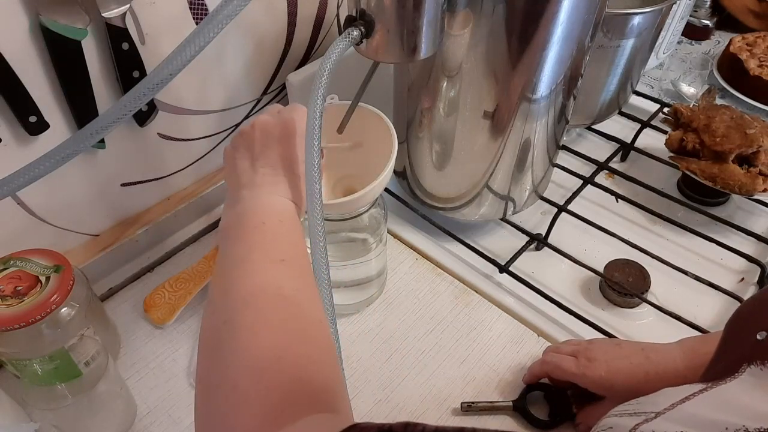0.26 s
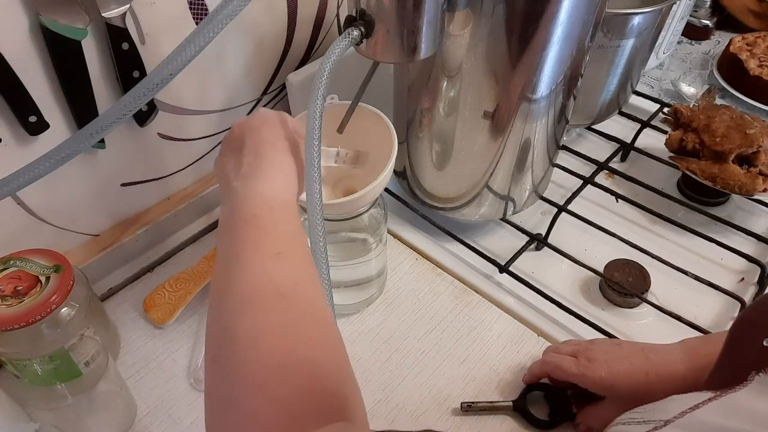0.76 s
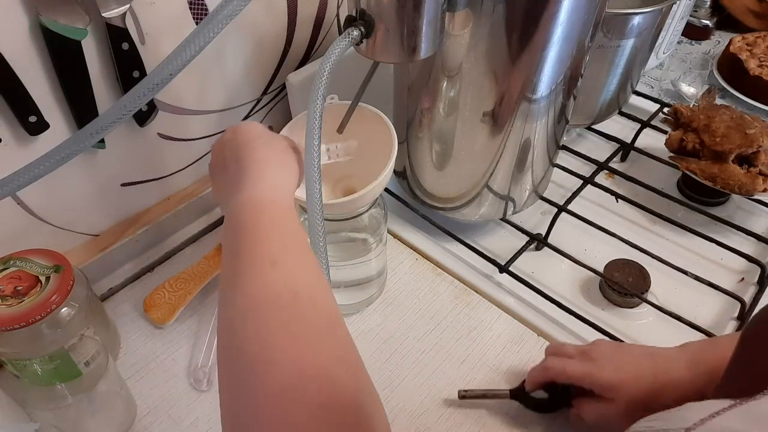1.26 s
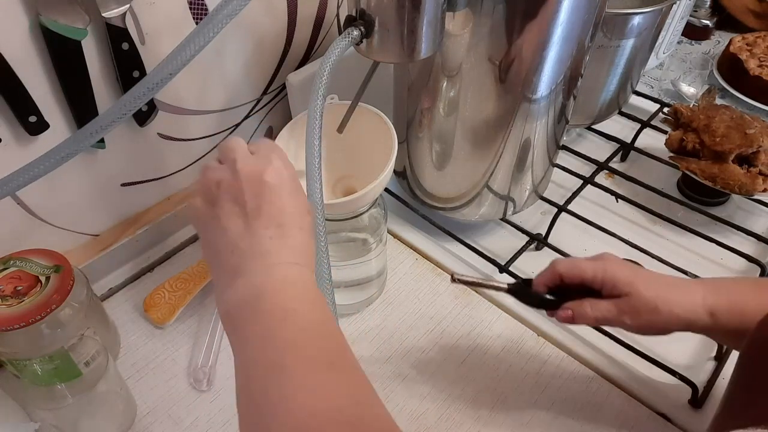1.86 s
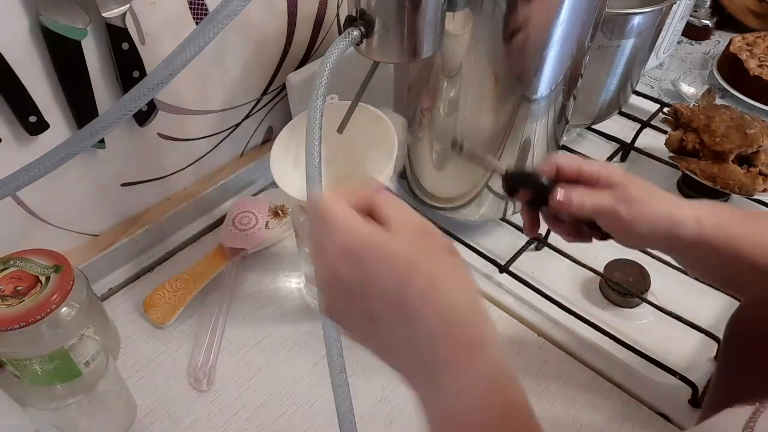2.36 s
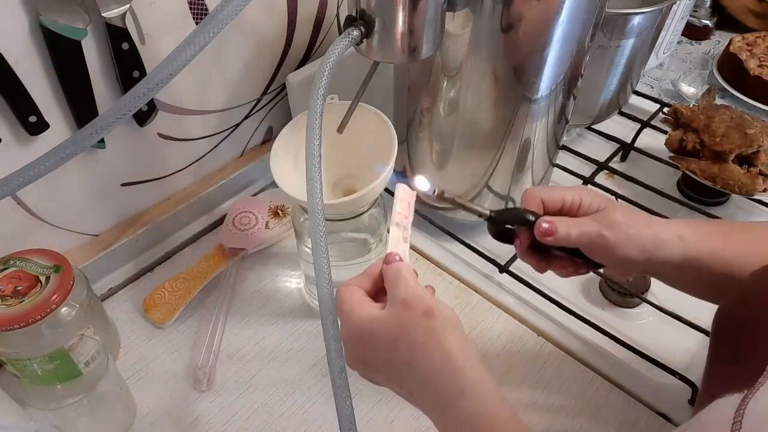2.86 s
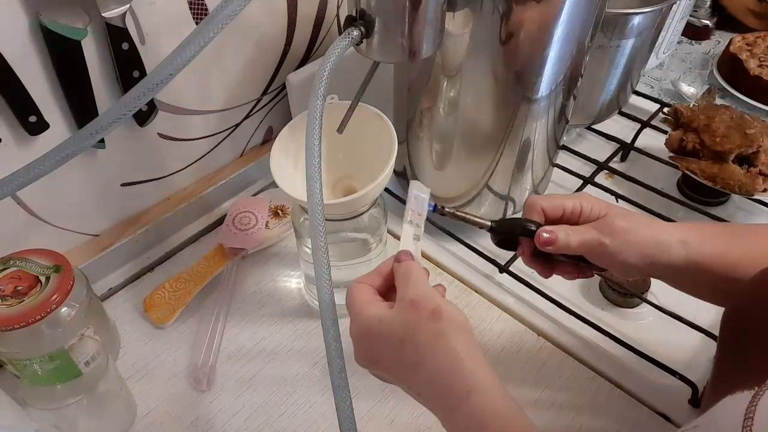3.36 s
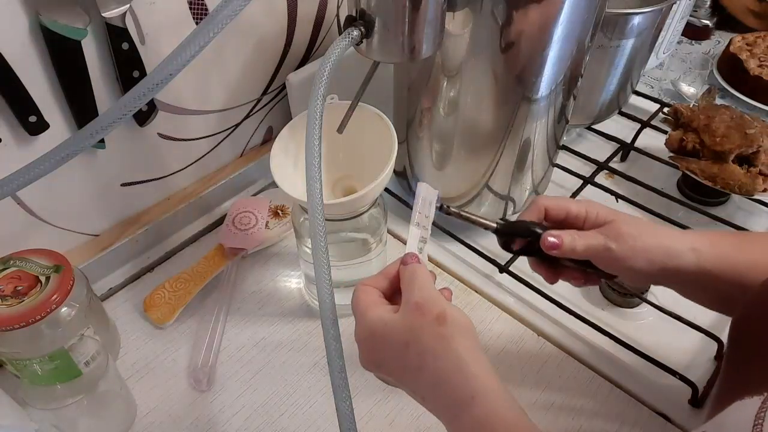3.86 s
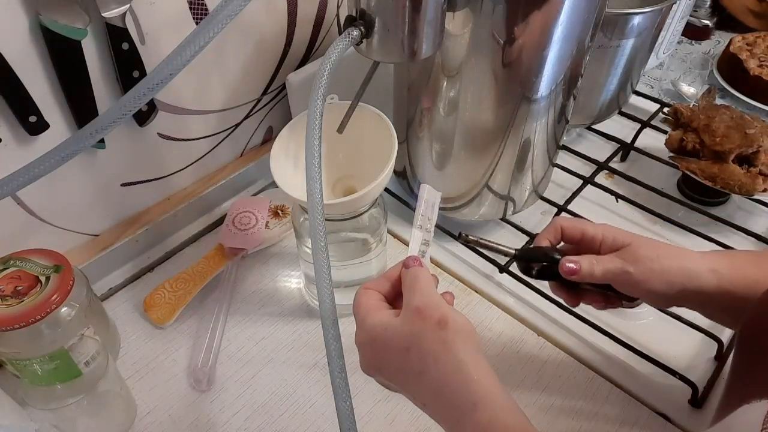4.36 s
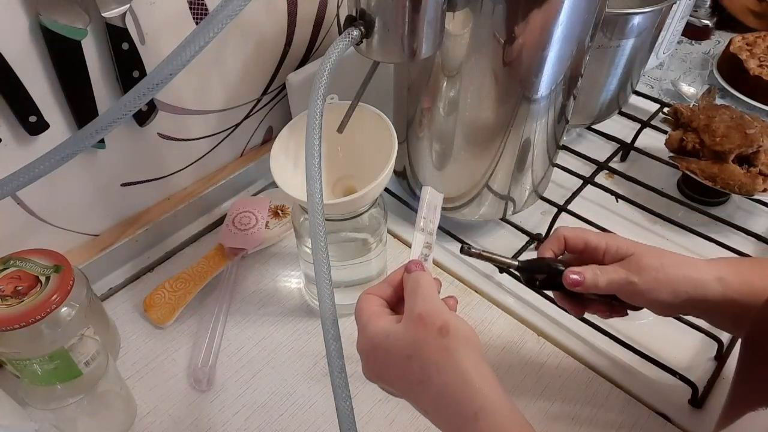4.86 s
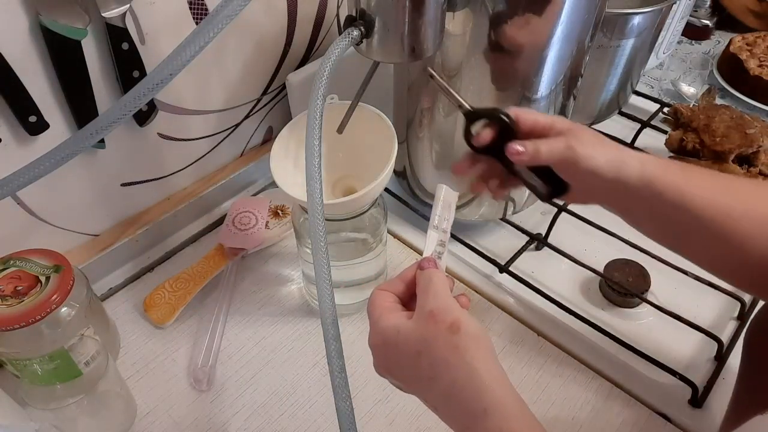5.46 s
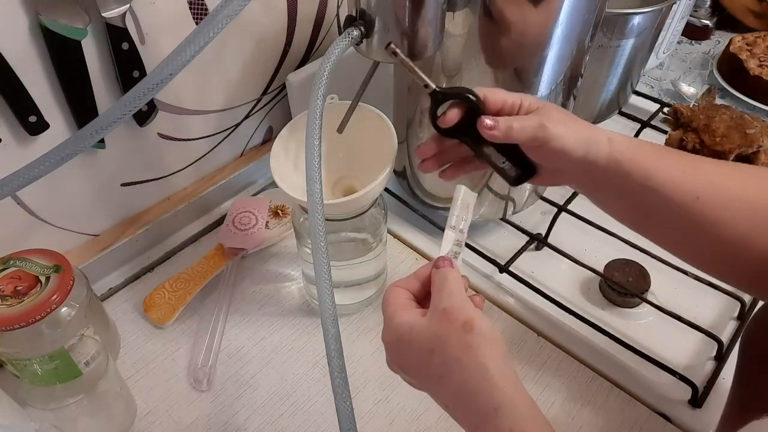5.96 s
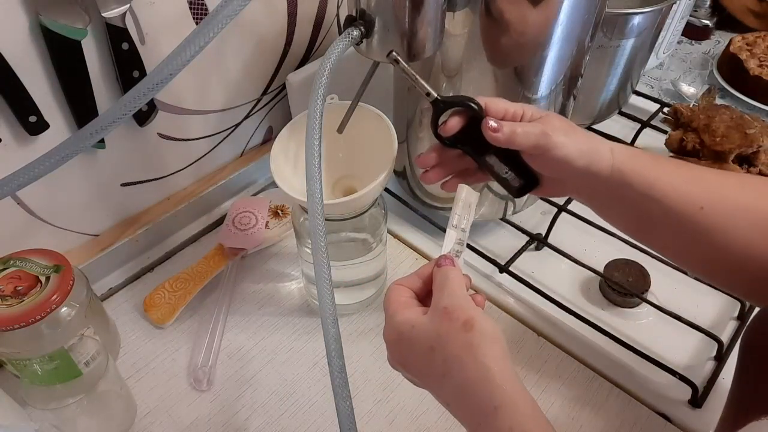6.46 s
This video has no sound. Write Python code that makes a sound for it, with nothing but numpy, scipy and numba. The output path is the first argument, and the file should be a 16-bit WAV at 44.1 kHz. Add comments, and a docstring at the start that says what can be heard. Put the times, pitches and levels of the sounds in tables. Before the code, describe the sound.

Liquid dribbles through a funnel into a jar with hollow, pitched plinks; a lighter knocks, snaps sharply, then releases softly in a small kitchen.

```python
"""A small kitchen: liquid from a hose drips fast into a funnel over a glass jar; each drop rings one of a few
air resonances, over a patter of small drops and a spray of tiny bubbles. A pot simmers (noise through
resonances) over mains hum. A gas lighter is knocked, fired and released (noise bursts through body resonances);
paper and hands tick faintly. The firing click drives the gain control down, and it creeps back for seconds."""
import sys
import numpy as np
from scipy import signal
from scipy.fft import rfft, irfft, next_fast_len
from scipy.io import wavfile
from scipy.ndimage import uniform_filter1d, minimum_filter1d
from numba import njit

SR = 44100
rng = np.random.default_rng(int(sys.argv[2]) if len(sys.argv) > 2 else 0)


def transcribe(u):
    """Save the signal u as a 16-bit wav file named by the first command-line argument.

    u: samples, shape (n,) or (channels, n), limited to [-1, 1]; the rate is SR.
    q: integer samples, one column per channel.
    """
    v = np.clip(np.atleast_2d(u).T, -1, 1)
    q = np.round(v * 32767).astype(np.int16)
    wavfile.write(sys.argv[1], SR, q)


def boost_factor(decibels):
    """Convert a level in decibels to a linear amplitude factor."""
    exponent = np.asarray(decibels, float) / 20
    return 10 ** exponent


N = 296340
T = np.arange(N) / SR
FFT_SIZE = next_fast_len(N)
F = np.fft.rfftfreq(FFT_SIZE, 1 / SR)

LEFT_LAG_S, LIGHTER_LEFT_LAG_S = 0.000209, -0.000193
# share of the ports' usual imbalance; the tail comes from all sides
LIGHTER_SHADE, KNOCK_SHADE, TAIL_SHADE = 1, 0.95, 0.27
JAR_ROOM_DB, LIGHTER_ROOM_DB, KNOCK_ROOM_DB = -2, 0, -1.5
ROOM_T60_S, ROOM_LOW_HZ = 0.28, 1140
HUM_HZ, HUM_DB, HUM_BALANCE_DB = 49.5, -35, 1.1  # balance: left minus right
KITCHEN_DB = -35
SURGE_RISE_S, SURGE_FALL_S, CALM_DB = 0.14, 0.55, -2
TICK_RISE_S, TICK_SNAP_S, TICK_TAIL_S = 0.0047, 0.004, 0.0053
FAINT_TICKS_PER_S, FAINT_TICK_DB, FAINT_TICK_HZ = 1.9, -42, (6600, 13000)
GRIT_DB, GRIT_S = 5, 0.0012  # uneven grains of a rattle
CLICK_SNAP_DB, KNOCK_SNAP_DB = 12.5, 12  # first contact over the noise that follows
SPRAY_HZ = (1510, 4000)
FLURRY_RISE_S, FLURRY_FALL_S, TRICKLE_DB = 0.035, 0.036, -79
DROP_RING_DB, DROP_T60_S = -15, 0.075
# the wet surface shakes each ring; phase swing at 1.2 and 2.4 kHz
WOBBLE_PER_S, WOBBLE_RAD, WOBBLE_DB = 160, (0.45, 0.9), 2
SPLASH_DB, SPLASH_HZ = -34, (1500, 3670)
PLOP_DB, PLOP_HZ, PLOP_S = -13, (500, 1630), 0.0065
PATTER_SPREAD_DB = 9.5
BUNCH_DB, BUNCHES_PER_S = 2.5, 8  # small drops come in bunches
MIC_LOW_HZ, MIC_TOP_HZ = 42, 15950
CEILING_DB, LOUD_DB = 3, -17  # thresholds: peak, 30 ms power


def on_log(table, hz):
    """Read a spectrum table on a log-frequency axis."""
    table_hz, value = np.array(table).T
    return np.interp(np.log(np.maximum(hz, 1)), np.log(table_hz), value)


def add(track, s, sound):
    """Mix a short sound in at time s."""
    i = int(s * SR)
    track[i:i + len(sound)] += sound[:N - i]


def walk(rate):
    """Random levels held 1 / rate s and slewed twice; spread near 1."""
    k = int(SR / rate)
    held = np.repeat(rng.standard_normal(N // k + 1), k)
    return 1.46 * uniform_filter1d(uniform_filter1d(held, k), k)[:N]


def swells(rows, rise_s, fall_s):
    """Sum of peaks (s, height) that build up and die away exponentially."""
    return sum(height * np.exp(-np.maximum((s - T) / rise_s, (T - s) / fall_s)) for s, height in rows)


def bandpass(order, low_hz, top_hz):
    """Butterworth band filter as second-order sections."""
    return signal.butter(order, [low_hz, top_hz], "bandpass", fs=SR, output="sos")


def ports(x, lag_s=LEFT_LAG_S, shade=1):
    """Two microphone ports: the left hears x (one track, or one per port) lag_s later, with its own colour."""
    # left-right colour: pitch_hz, left_minus_right_db
    balance = [(60, -2), (200, 0.5), (380, 0.8), (700, 5), (1290, 0), (2380, 12), (4400, 15), (8120, 14.5),
               (15000, -2)]
    tilt = boost_factor(shade * on_log(balance, F) / 2)
    response = np.array([tilt * np.exp(-2j * np.pi * F * lag_s), 1 / tilt])
    return irfft(rfft(x, FFT_SIZE) * response, FFT_SIZE)[:, :N]


def room(x, tail_db, lag_s=LEFT_LAG_S, shade=1):
    """Direct sound plus a dense decaying tail with little bass, unrelated at the two ports."""
    t = T[:SR // 2]
    decay = 1000. ** (-t / ROOM_T60_S) * np.clip(t / 0.0029 - 0.5, 0, 1)
    tail = rng.standard_normal((2, len(t))) * decay
    tail = signal.sosfilt(signal.butter(1, ROOM_LOW_HZ, "highpass", fs=SR, output="sos"), tail)
    tail /= np.sqrt(np.sum(tail ** 2, axis=1, keepdims=True))
    reverb = boost_factor(tail_db) * signal.fftconvolve(x[None], tail, axes=1)[:, :N]
    return ports(x, lag_s, shade) + ports(reverb, lag_s, TAIL_SHADE)


def hum():
    """Mains hum: one sine that wavers a little in level and pitch."""
    level = np.sqrt(2) * boost_factor(HUM_DB + 0.17 * walk(4.3))
    return level * np.sin(2 * np.pi * np.cumsum(HUM_HZ + 0.3 * walk(4.37)) / SR)


def kitchen():
    """Simmer noise through the pot's resonances; half-octave bands flicker alone; bass is alike left and right."""
    # noise spectrum before levelling: pitch_hz, density_db_per_hz
    noise_floor = [(15, -44), (25, -8), (59, -9), (97, -11), (134, -16), (309, -14.5), (416, -8),
                   (463, -12), (1070, -23), (1260, -20), (1700, -35.5), (2410, -23.5), (3160, -36.5),
                   (11300, -40), (16000, -43.5)]
    # pot resonances: pitch_hz, width_hz, height_over_noise_db
    pot = [(71.3, 5.3, 10.5), (134.4, 20.4, 14), (194, 5, 9), (267.6, 7.4, 10), (408.1, 8.2, 9),
           (678, 25, 6), (3380, 39, 9), (7500, 1800, 3.5)]
    # share of power common to both ports: pitch_hz, share
    likeness = [(60, 0.92), (300, 0.9), (700, 0.85), (1500, 0.32), (4000, 0.033), (12000, 0.1)]
    # surges of the boil, in full at the lowest pitches: peak_s, height_db
    surges = [(.05, 5), (.45, 2.5), (.75, -1), (1.4, 3.5), (1.93, 4.5), (2.65, 5), (3.6, 3), (4.65, 7),
              (5.9, 2.5), (6.7, 2.5)]
    # treble hiss and rustle, in full at the highest pitches: time_s, level_db
    hiss = [(0, 2.5), (.5, 3.5), (1.4, 0.5), (1.9, -1), (2.65, 0.5), (3.1, -1), (4.1, -0.5), (5.1, -0.5),
            (6, 1.5), (6.72, 0)]
    peaks_db = sum(db / (1 + (2 * (F - hz) / width) ** 2) for hz, width, db in pot)
    colour = boost_factor(on_log(noise_floor, F) + peaks_db)
    like = np.clip(on_log(likeness, F), 0, 1)
    shared, left, right = rfft(rng.standard_normal((3, FFT_SIZE)))
    common = rfft(ports(irfft(shared * np.sqrt(like), FFT_SIZE)), FFT_SIZE)
    both = common + np.array([left, right]) * np.sqrt(1 - like)
    swell_db = walk(4.35)
    rumble_db = CALM_DB + swells(surges, SURGE_RISE_S, SURGE_FALL_S)
    hiss_db = np.interp(T, *np.transpose(hiss))
    out = 0
    for hz in 30 * 2. ** np.arange(0, 10, 0.5):
        octaves = np.log2(np.maximum(F, 1) / hz)
        share = np.cos(np.pi / 2 * np.clip(2 * octaves, -1, 1)) ** 2
        low = 1 / (1 + (hz / 1500) ** 2)  # surges are a low sound; the hiss above drifts on its own
        band_db = low * rumble_db + (1 - low) * hiss_db + swell_db + 1.3 * walk(10)
        out = out + irfft(both * colour * share, FFT_SIZE)[:, :N] * boost_factor(band_db)
    return out * boost_factor(KITCHEN_DB) / np.sqrt(np.mean(out ** 2))


def ticks():
    """Paper and hands: short puffs of noise, each around its own centre; faint ones come at random."""
    # clear ticks: start_s, peak_db, centre_hz
    clear = [(0.182, -33.5, 7900), (.662, -40, 10300), (0.742, -33.5, 9200), (.977, -39, 7250),
             (1.779, -33, 10800), (1.883, -38, 9700), (2.227, -30.5, 11500), (2.246, -33, 7200),
             (2.631, -37.5, 10700), (2.68, -40.5, 4000), (3.524, -35, 9100), (3.679, -36, 6600),
             (4.13, -38, 12200), (4.6513, -36.5, 8300), (5.076, -39, 11500), (5.124, -35.5, 11100),
             (5.147, -41, 3540), (5.2, -39, 6740), (5.389, -32, 13800), (5.447, -26, 13000),
             (5.5906, -32.5, 10700), (5.766, -36.5, 7500), (6.087, -28, 13000)]
    out, t = np.zeros(N), T[:SR // 5]
    gap, pitch = rng.random((80, 2)).T
    faint_s = np.cumsum(2 * gap / FAINT_TICKS_PER_S)
    faint = zip(faint_s, [FAINT_TICK_DB] * len(gap), np.interp(pitch, (0, 1), FAINT_TICK_HZ))
    fall = np.exp(-t / TICK_SNAP_S) + 0.5 * np.exp(-t / TICK_TAIL_S)
    shape = np.clip(t / TICK_RISE_S, 0, 1) * fall
    for s, db, hz in clear + [row for row in faint if row[0] < N / SR]:
        band = bandpass(3, hz / 1.18, min(hz * 1.25, 0.45 * SR))
        puff = signal.sosfilt(band, rng.standard_normal(len(t))) * shape
        add(out, s, boost_factor(db) * puff / np.abs(puff).max())
    return out


def strike(peaks, low_hz, top_hz, contact_s, rattle_db, snap_db):
    """A snap, contact noise and a looser rattle through broad resonances; 0 dB rms over the first 10 ms."""
    t = T[:SR // 6]
    grit = boost_factor(GRIT_DB * np.repeat(rng.standard_normal(len(t)), int(GRIT_S * SR))[:len(t)])
    envelope = np.exp(-t / contact_s) + boost_factor(rattle_db) * grit * np.exp(-t / 0.022)
    push = rng.standard_normal(len(t)) * np.clip(t / 0.000082, 0, 1) * envelope
    push = push + boost_factor(snap_db) * signal.unit_impulse(len(t), SR // 2000)
    # a soft contact pushes longer: no treble
    push = signal.sosfilt(bandpass(3, low_hz, min(top_hz, 0.45 * SR)), push)
    f = np.fft.rfftfreq(4096, 1 / SR) + 1
    power = sum(boost_factor(2 * db) * 1000 / width / (1 + ((f ** 2 - hz ** 2) / (f * width)) ** 2)
                for hz, width, db in peaks)
    cepstrum = irfft(np.log(power))[:len(f)]  # folded onto positive times: a causal response
    cepstrum[0] /= 2
    response = irfft(np.exp(rfft(cepstrum, 2 * len(f) - 2)))
    blow = signal.fftconvolve(push, response)[:len(t)]
    return blow / np.sqrt(np.mean(blow[:SR // 100] ** 2))


def lighter():
    """Trigger snaps excite the plastic shell; knocks on the enamel top differ in band and contact time."""
    # trigger snaps: start_s, rms_db, blow_low_hz, contact_s
    clicks = [(2.8883, -8, 1940, 0.0031), (3.74, -45, 1500, 0.0012), (3.7992, -24.5, 394, 0.0052)]
    # shell resonances: pitch_hz, width_hz, relative_db
    shell = [(1200, 700, 8), (2320, 200, 1), (2640, 300, 7), (3200, 700, 5), (4000, 350, 3), (6060, 600, 0),
             (7200, 1000, 3), (8730, 1300, 4.5), (11400, 3500, -3), (14400, 7700, 8.5)]
    # lighter body against the enamel: start_s, rms_db, blow_low_hz, blow_top_hz, contact_s
    knocks = [(1.151, -24.5, 450, 1500, 0.0061), (1.1555, -28, 400, 4230, 0.003),
              (1.164, -34, 300, 1290, 0.0026), (1.208, -19.5, 450, 9150, 0.0039)]
    # enamel top resonances: pitch_hz, width_hz, relative_db
    enamel = [(597, 75, 8), (810, 110, 1), (1260, 71, 3), (1580, 210, 10), (2010, 200, -21),
              (2780, 260, 3.5), (3700, 160, 5.5), (4850, 1800, -21), (7100, 470, 2.5), (11500, 2400, 13)]
    trigger, body = np.zeros(N), np.zeros(N)
    for s, db, low_hz, contact_s in clicks:
        blow = strike(shell, low_hz, SR, contact_s, rattle_db=-17, snap_db=CLICK_SNAP_DB)
        add(trigger, s, boost_factor(db) * blow)
    for s, db, low_hz, top_hz, contact_s in knocks:
        blow = strike(enamel, low_hz, top_hz, contact_s, rattle_db=-39, snap_db=KNOCK_SNAP_DB)
        add(body, s, boost_factor(db) * blow)
    return trigger, body


def spray():
    """A dense froth of tiny bubbles, pitch gliding up, coming in flurries."""
    # splashing of the stream: peak_s, level_db
    flurries = [(0, -46.5), (.5, -56), (1.1, -46), (1.3, -48), (1.7, -53), (2.3, -48.5), (2.6, -54),
                (3.45, -62), (3.7, -46), (4.5, -53.5), (5.17, -52), (5.45, -52), (5.9, -48), (6.1, -51),
                (6.38, -54), (6.72, -49)]
    t = T[:SR // 100]
    start, pitch, size = rng.random((9000, 3)).T[:, :, None]
    hz = SPRAY_HZ[0] * (SPRAY_HZ[1] / SPRAY_HZ[0]) ** pitch
    envelope = boost_factor(-2 * np.log(size + 1e-2)) * t * np.exp(-t * hz / 5) * hz
    bubbles = envelope * np.sin(2 * np.pi * hz * t * (1 + 5 * t))
    index = (start * N).astype(int) + np.arange(len(t))
    out = np.bincount(index.ravel(), bubbles.ravel(), N)[:N]
    peaks = [(s, boost_factor(db)) for s, db in flurries]
    flow = boost_factor(TRICKLE_DB) + swells(peaks, FLURRY_RISE_S, FLURRY_FALL_S)
    return out / np.sqrt(np.mean(out ** 2)) * flow * boost_factor(2 * walk(18))


def drop(hz, phase, shake, flutter, froth, plop):
    """A bubble drives an air resonance in one shaky swell; a weaker ring lingers; the impact plops and splashes."""
    # length of the swell: pitch_hz, length_s
    swell_length = [(420, 0.049), (620, 0.019), (1260, 0.023), (1900, 0.0021), (2400, 0.018),
                    (3400, 0.0081), (7500, 0.0086)]
    t, length = T[:len(shake)], on_log(swell_length, hz)
    rise = np.clip(t / length, 0, 1)
    swell = np.sin(np.pi * rise ** 0.5) ** 2
    ring = boost_factor(DROP_RING_DB) * rise * 1000. ** (-t / DROP_T60_S)
    swing = np.interp(hz, (1200, 2400), WOBBLE_RAD)
    tone = (swell + ring) * boost_factor(WOBBLE_DB * flutter) * np.sin(2 * np.pi * hz * t + phase + swing * shake)
    splash = boost_factor(SPLASH_DB) * froth * t / 0.0083 * np.exp(-t / 0.0076)
    return tone + splash + boost_factor(PLOP_DB) * plop * t / PLOP_S * np.exp(1 - t / PLOP_S)


def dripping():
    """Clear drops over a random patter of small ones, each with its own stretch of wobble and water noise."""
    # clear drops: start_s, level_db, pitch_hz
    clear = [(.002, -30, 1260), (0.055, -29.5, 1260), (.055, -30, 606), (.179, -33, 585), (.229, -33, 690),
             (.372, -31, 610), (.46, -33, 600), (.513, -34, 457), (.721, -35, 584), (.335, -26, 1260),
             (0.583, -44, 1260), (.665, -40, 1260), (1.517, -36, 517), (1.777, -38, 600),
             (1.948, -33, 1257), (1.992, -38, 544), (2.432, -32, 590), (2.687, -32.5, 480),
             (0.149, -29.5, 1250), (0.231, -25.5, 1220), (0.28, -27, 1266), (0.34, -29.5, 2366),
             (0.373, -41, 2340), (.059, -38, 2380), (1.611, -37, 2375), (1.782, -36, 2340),
             (2.227, -41.5, 2390), (6.021, -38, 2385), (.448, -24, 1246), (.456, -37, 2310),
             (.478, -26, 1273), (.513, -37, 3580), (.054, -47, 3490), (0.101, -47.5, 3450),
             (0.307, -41, 2410), (0.718, -33.5, 1270), (.797, -36, 2410), (0.812, -23.5, 1212),
             (0.959, -32.5, 1243), (0.987, -31, 1240), (1.05, -35, 1990), (1.053, -30.5, 2410),
             (1.09, -37, 2350), (1.091, -39, 3080), (1.286, -27, 1297), (1.323, -38, 2060),
             (1.445, -35, 2010), (1.705, -44, 2950), (2.207, -51, 2820), (2.229, -44, 2850),
             (1.365, -31, 1240), (1.418, -19.5, 1262), (1.7, -32, 1264), (1.771, -33, 1235),
             (1.905, -26.5, 1260), (1.908, -26.5, 476), (2.056, -32, 1290), (2.094, -27.5, 2385),
             (2.129, -32, 1273), (2.236, -29, 1270), (2.305, -24, 2317), (2.304, -25, 1262),
             (2.318, -35, 2440), (2.483, -21.5, 1268), (2.51, -33, 2370), (2.528, -38, 2430),
             (2.563, -31, 1238), (2.571, -44, 3340), (2.585, -43, 3410), (2.608, -48, 3400),
             (2.678, -35.5, 2440), (2.592, -32, 435), (2.594, -24, 1260), (2.622, -25, 1280),
             (2.672, -29.5, 1247), (2.716, -25, 1260), (2.737, -23, 1252), (2.747, -30.5, 440),
             (2.763, -21, 1252), (3.02, -16.5, 1250), (3.236, -25, 1250), (3.303, -21.5, 1260),
             (3.357, -28, 1236), (3.405, -37, 2420), (3.435, -35, 1200), (3.45, -33, 2390),
             (3.447, -25, 1260), (3.483, -19, 1830), (3.524, -28, 1250), (3.569, -13, 1274),
             (3.597, -20.5, 1251), (3.634, -31, 2410), (3.659, -34.5, 2370), (3.722, -32, 2420),
             (4.014, -42, 2390), (4.114, -37, 2360), (4.14, -33, 2360), (4.848, -42, 2430),
             (4.979, -36.5, 2400), (3.777, -29, 1248), (3.827, -24, 1250), (3.9, -27.5, 1250),
             (3.939, -28.5, 1265), (3.979, -31.5, 1244), (4.012, -21, 1253), (4.11, -31, 1262),
             (4.401, -29.5, 1265), (4.408, -37, 2300), (4.46, -33, 2345), (4.459, -37, 2780),
             (4.54, -38, 3050), (4.544, -33, 2340), (4.775, -41, 2360), (4.58, -26.5, 748),
             (4.54, -38, 1580), (4.491, -30, 1260), (4.512, -23, 1270), (4.561, -25.5, 1272),
             (4.575, -35, 1680), (4.583, -18, 1284), (4.67, -29.5, 1290), (4.677, -29, 461),
             (4.71, -29, 1280), (4.738, -25.5, 1230), (5.04, -29.5, 1280), (5.143, -39, 1230),
             (5.147, -37.5, 2370), (5.19, -41, 2370), (5.215, -30.5, 1297), (5.29, -29.5, 424),
             (5.366, -39, 1260), (5.292, -29.5, 2390), (5.4, -29.5, 1247), (5.426, -23.5, 1270),
             (5.502, -31.5, 1256), (5.538, -23, 1256), (5.569, -27, 1264), (5.643, -30, 1306),
             (5.835, -30.5, 1260), (5.862, -29.5, 1264), (5.768, -34, 2400), (5.871, -31, 2375),
             (5.927, -32.5, 2400), (6.021, -24, 1257), (6.008, -43, 3350), (6.365, -41, 3100),
             (6.672, -45, 3180), (6.063, -26, 1262), (6.115, -30, 1190), (6.135, -23.5, 1260),
             (6.187, -23, 1280), (6.198, -22.5, 1260), (6.248, -27, 1255), (6.272, -26.5, 1287),
             (6.497, -34, 2420), (6.542, -26.5, 1275), (6.567, -29, 1230), (6.598, -26, 1287),
             (6.642, -26, 1245), (6.671, -25.5, 1263)]
    # resonances that small drops ring: pitch_hz, pitch_range_hz, drops_per_s, level_db
    patter = [(1262, 87, 48, -40.5), (2385, 127, 45, -49), (612, 385, 25, -42.5), (3270, 1280, 60, -58.5),
              (7400, 360, 6, -51)]
    out, size = np.zeros(N), SR // 10
    froth = signal.sosfilt(bandpass(2, *SPLASH_HZ), rng.standard_normal(N))
    plop = signal.sosfilt(bandpass(2, *PLOP_HZ), rng.standard_normal(N))
    water = np.array([walk(WOBBLE_PER_S), walk(WOBBLE_PER_S), froth, plop / plop.std() / 2])

    def piece(u):
        return water[:, int(u * (N - size)):][:, :size]

    for (s, db, hz), (u, v) in zip(clear, rng.random((len(clear), 2))):
        add(out, s, boost_factor(db) * drop(hz, 2 * np.pi * u, *piece(v)))
    for hz, width, rate, db in patter:
        bunch_db = BUNCH_DB * walk(BUNCHES_PER_S)
        for when, pitch, level, place in rng.random((400, 4)):
            s = when * 400 / rate
            if s < N / SR:
                drop_db = db + bunch_db[int(s * SR)] + PATTER_SPREAD_DB * (level - 0.5)
                add(out, s, boost_factor(drop_db) * drop(hz + width * (pitch - 0.5), 0, *piece(place)))
    return out


def scene():
    """Close sources with their room tail, over the steady kitchen; the jar shields its sounds from the room."""
    trigger, body = lighter()
    jar = room(dripping() + spray(), JAR_ROOM_DB)
    clicks = room(trigger, LIGHTER_ROOM_DB, LIGHTER_LEFT_LAG_S, LIGHTER_SHADE)
    knocks = room(body + ticks(), KNOCK_ROOM_DB, shade=KNOCK_SHADE)
    mains = hum() * boost_factor(np.array([[HUM_BALANCE_DB], [-HUM_BALANCE_DB]]) / 2)
    return jar + clicks + knocks + kitchen() + mains


@njit
def duck_db(peak_db, loud_db, fast_fall, slow_fall, hold):
    """Gain cut: a peak limiter that lets go quickly and a loudness stage that holds, then creeps back."""
    cut, fast, slow, wait = np.empty(len(peak_db)), 0., 0., 0.
    for i in range(len(peak_db)):
        fast = max(peak_db[i], fast * fast_fall)
        wait += 1
        if loud_db[i] > slow:
            slow, wait = loud_db[i], 0.
        elif wait > hold:
            slow *= slow_fall
        cut[i] = max(fast, slow)
    return cut


def top_cut(x):
    """Nothing passes above the cut-off."""
    return signal.sosfilt(signal.butter(12, 16650, fs=SR, output="sos"), x)


def record(dry):
    """Microphone band limits, gain control that looks 2 ms ahead, then a hard ceiling."""
    mic = signal.sosfilt(signal.butter(6, MIC_LOW_HZ, "highpass", fs=SR, output="sos"), dry)
    mic = signal.sosfilt(signal.ellip(10, 0.2, 70, MIC_TOP_HZ, fs=SR, output="sos"), mic)
    peak = -minimum_filter1d(-np.abs(mic).max(axis=0), size=177)
    power = uniform_filter1d(np.mean(mic ** 2, axis=0), size=1323, origin=600)  # 30 ms, nearly all past
    peak_db = np.maximum(20 * np.log10(peak + 1e-9) - CEILING_DB, 0)
    loud_db = np.maximum(10 * np.log10(np.abs(power) + 1e-12) - LOUD_DB, 0)
    # release time constants 0.1 s and 1.7 s, hold 0.6 s
    cut_db = duck_db(peak_db, loud_db, np.exp(-1 / (0.1 * SR)), np.exp(-1 / (1.7 * SR)), 0.6 * SR)
    mix = np.clip(mic * boost_factor(-uniform_filter1d(cut_db, size=89)), -1, 1)
    return top_cut(mix)


dry = scene()
out = record(dry)
transcribe(out)
```